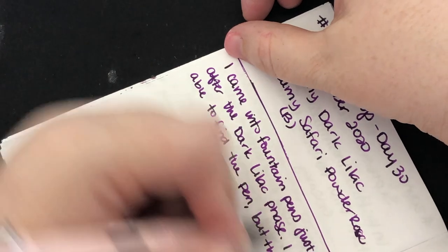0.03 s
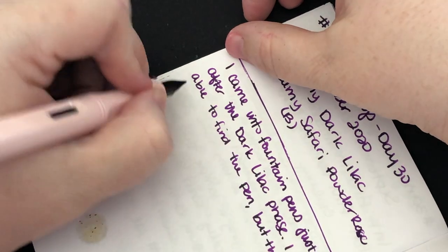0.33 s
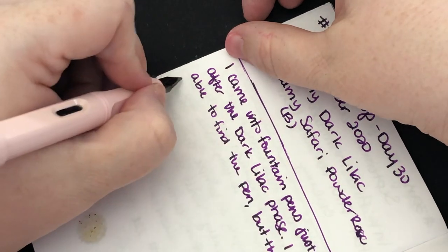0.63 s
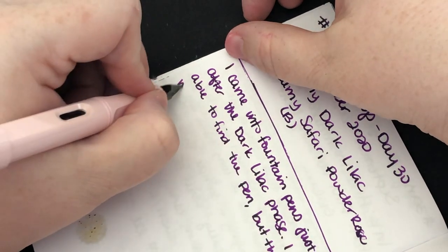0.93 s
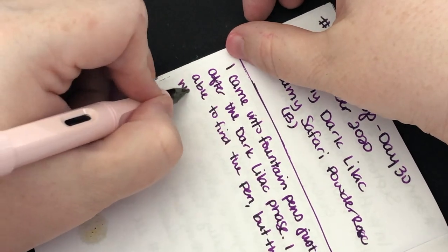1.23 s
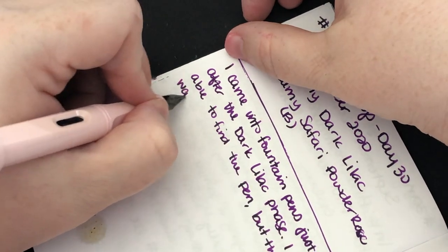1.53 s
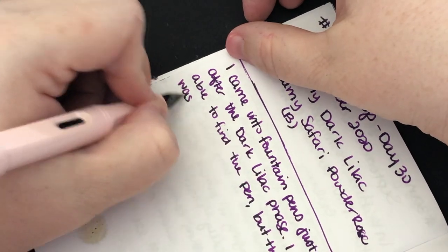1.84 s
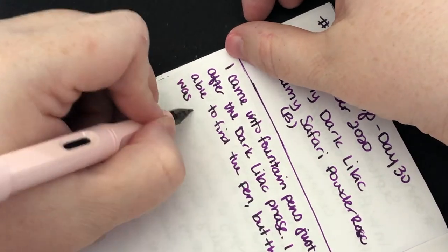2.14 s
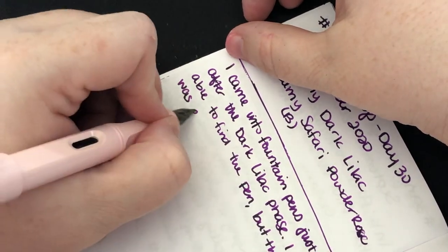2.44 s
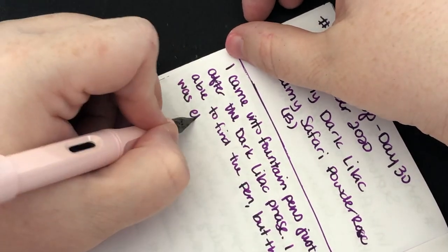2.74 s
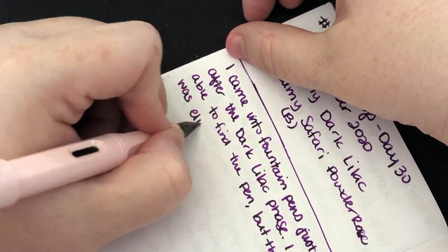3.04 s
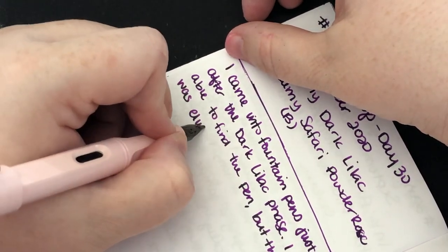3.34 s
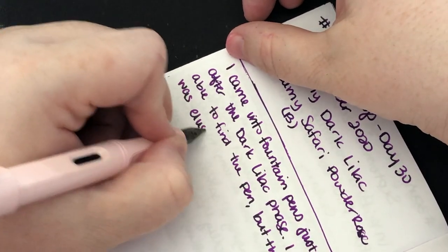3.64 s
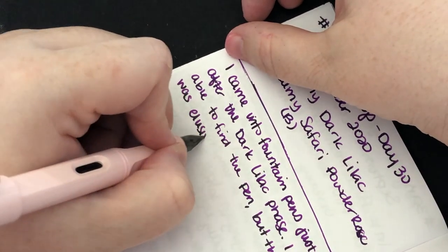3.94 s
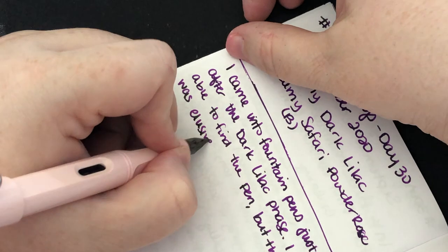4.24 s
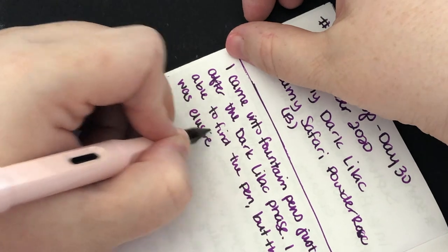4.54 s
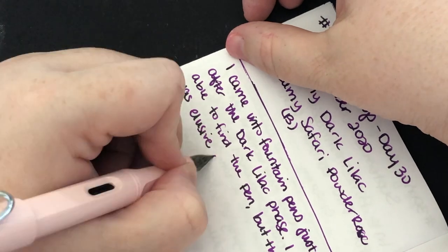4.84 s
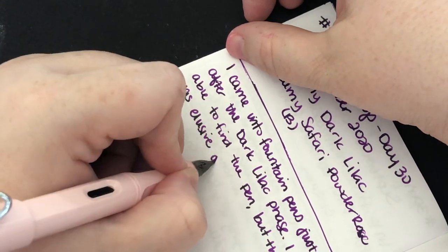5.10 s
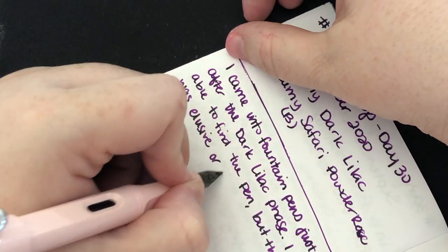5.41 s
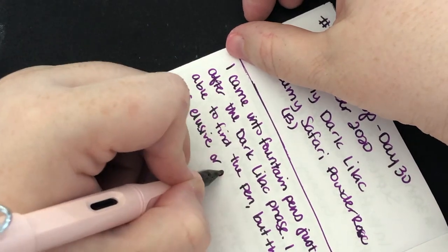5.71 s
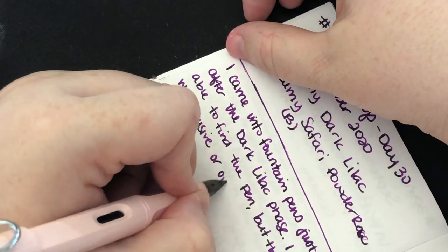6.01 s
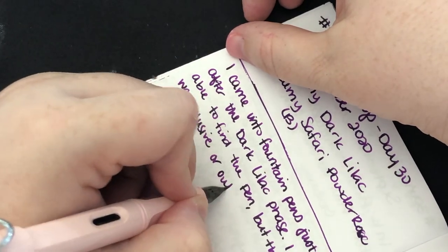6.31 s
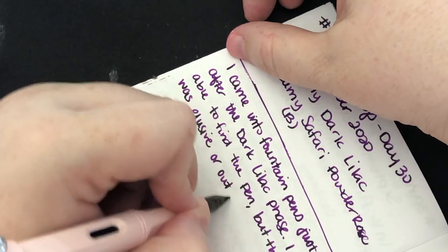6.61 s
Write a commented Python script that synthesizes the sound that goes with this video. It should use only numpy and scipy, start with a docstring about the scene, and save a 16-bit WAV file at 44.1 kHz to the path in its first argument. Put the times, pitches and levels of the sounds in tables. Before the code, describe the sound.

A fountain pen writes on notebook paper, heard close up in a quiet room. A soft fan-like rush, light hiss and faint hum run throughout, over a very deep rumble that swells slightly at times. At the very start a hand brushes briefly across the page. From about 0.7 seconds the steel nib scratches in faint, dry strokes, each around a tenth of a second long, grouped unevenly with short gaps and continuing until about 6.8 seconds. Near 1.9 seconds the nib makes one quick, bright flick with a tick as the hand shifts. The hand slides softly again around 4.5, 5.2 and 6.5 seconds, and gives barely audible low bumps on the desk near 1.2, 3.3, 3.8 and 4.4 seconds. The nib touches down with small dull ticks at about 3.7 seconds and three times between 5.2 and 5.6 seconds, where the writing is slightly firmer.

```python
"""Fountain pen in a notebook

A steel nib writes a few words in a quiet room. Each stroke drags it over paper fibres, whose catches
ring pen, nib and pad faintly. Between words the hand slides over the page or bumps the desk; the nib
flicks once and now and then taps down. Behind: a soft fan-like rush, hiss, deep rumble and hum."""
import sys
import numpy as np
from scipy import signal
from scipy.fft import rfft, irfft
from scipy.io import wavfile

SR = 44100
rng = np.random.default_rng(int(sys.argv[2]) if len(sys.argv) > 2 else 0)


def wav_out(sig):
    """Save sig, one row per channel (or a flat mono array), as 16-bit PCM at SR to the path in sys.argv[1]."""
    wavfile.write(sys.argv[1], SR, np.round(np.clip(np.atleast_2d(sig).T, -1, 1) * 32767).astype(np.int16))


N = 298116
TIME = np.arange(N) / SR


def from_db(db):
    """Decibels to gain."""
    return 10 ** (np.asarray(db) / 20)


def rms_one(x):
    """Scale to unit rms."""
    return x / np.sqrt(np.mean(x ** 2) + 1e-20)


def coloured(x, spectrum):
    """Filter by (Hz, relative dB) points, rolling off below the first; rms 1."""
    hz, db = np.transpose(spectrum)
    bins_hz = np.maximum(np.arange(N // 2 + 1) * SR / N, 1e-3)
    gain = from_db(np.interp(np.log(bins_hz), np.log(hz), db))
    roll_off = np.minimum(bins_hz / hz[0], 1) ** 2
    return rms_one(irfft(rfft(x) * gain * roll_off, N))


def fibres(per_s, spread_db):
    """Paper fibres catch and let go at random: dense clicks of uneven size."""
    sizes = from_db(spread_db * np.minimum(rng.exponential(1, N), 4))
    signs = rng.choice([-1, 1], N)
    return sizes * signs * (rng.random(N) < per_s / SR)


def resonate(catches, modes):
    """Each catch pushes or pulls each resonance by chance; rms 1."""
    out = np.zeros(N)
    for hz, width_hz, db in modes:
        b, a = signal.iirpeak(hz, hz / width_hz, fs=SR)
        pushes = catches * rng.choice([-1, 1], N)
        out += from_db(db) * signal.lfilter(b, a, signal.lfilter(b, a, pushes))  # twice: deep valleys
    return rms_one(out)


def knocks(contacts, modes):
    """Single contacts ring damped modes in parallel; a soft contact has no treble."""
    force, out = np.zeros((2, N))
    for start_s, db, cutoff_hz in contacts:
        softness = signal.butter(3, cutoff_hz, fs=SR, output="sos")
        push = signal.sosfilt(softness, signal.unit_impulse(2048))
        at = round(start_s * SR)
        force[at:at + len(push)] += from_db(db) * push
    for hz, width_hz, db in modes:
        radius, angle = np.exp(-np.pi * width_hz / SR), 2 * np.pi * hz / SR
        feedback = [1, -2 * radius * np.cos(angle), radius ** 2]
        out += from_db(db) * signal.lfilter([0, np.sin(angle)], feedback, force + 1e-18)
    return out


def speed(start_s, length_s):
    """Speed of one movement: a near-symmetric arch, peak 1."""
    phase = np.clip((TIME - start_s) / length_s, 0, 1) ** 0.95
    return 4 * phase * (1 - phase)


def swell(start_s, hold_s, rise_db_per_s, fall_db_per_s):
    """Gain that reaches 1 at start_s, holds and dies away."""
    early_s = np.maximum(start_s - TIME, 0)
    late_s = np.maximum(TIME - start_s - hold_s, 0)
    return from_db(-np.minimum(rise_db_per_s * early_s + fall_db_per_s * late_s, 200))


def sliding_hand():
    """Skin on paper: a fine-grained rub, with a high sizzle on fast slides."""
    # Each row: start in seconds, length in seconds, level in dB, sizzle in dB relative to the rub.
    slides = [(-.06, 0.11, -60.5, 9.5), (0.029, 0.033, -70, 12), (0.034, 0.072, -66, 5),
              (0.084, .11, -63, -16), (1.86, 0.13, -71.5, 0), (4.482, 0.15, -67, 1),
              (5.207, 0.095, -67, -12), (6.48, 0.1, -69, -2)]
    # Each row of both: frequency in Hz, relative level in dB.
    rub_colour = [(1000, -11), (2000, 6), (2750, -1), (3400, -2.5), (4600, 6), (5300, 5), (5900, 6.5),
                  (6800, -3), (7700, 5), (8800, 3), (10000, -3), (11400, 0.5), (15500, -5)]
    sizzle_colour = [(4000, -27), (7000, -20), (8000, -5.5), (9000, -6), (10000, -14.5), (11800, -1.5),
                     (13000, -6), (14000, -1), (15700, -0.5)]
    rub = coloured(fibres(per_s=23000, spread_db=2.0), rub_colour)
    sizzle = coloured(fibres(per_s=18000, spread_db=1.5), sizzle_colour)
    return sum(from_db(db) * speed(start_s, length_s) * (rub + from_db(sizzle_db) * sizzle)
               for start_s, length_s, db, sizzle_db in slides)


def rush_and_hiss(rush_db=-59.5, hiss_db=-70):
    """Steady fan-like rush and microphone hiss."""
    # Each row of both: frequency in Hz, relative level in dB.
    rush_colour = [(25, 8), (45, 9.5), (80, 1), (200, 1), (270, 2.5), (450, -3.5), (620, -1), (780, -4),
                   (1150, -0.5), (1600, -10), (2100, -14), (2700, -23), (4000, -30)]
    hiss_colour = [(1000, -15.5), (2700, 2), (3100, 3), (3700, 3), (5500, 3), (7200, 1.5), (8500, 4.5),
                   (9400, 0.9), (15500, 0.5)]
    rush = from_db(rush_db) * coloured(rng.standard_normal(N), rush_colour)
    hiss = from_db(hiss_db) * coloured(rng.standard_normal(N), hiss_colour)
    return rush + hiss


def deep_rumble(rest_db=-49.5):
    """Rumble that rises quickly as the hand shifts its weight, then settles slowly."""
    # Each row: peak time in seconds, level in dB.
    hand_shifts = [(.24, -37.5), (1.0, -43), (1.98, -41.5), (2.68, -49), (3.15, -49.5), (4.54, -38.5),
                   (5.27, -42), (6.22, -41), (6.57, -43)]
    # Each row: frequency in Hz, relative level in dB.
    rumble_colour = [(3, -16), (7, -3.5), (12, 1), (16, 6.5), (20, 10), (26, -35.5), (45, -43.5),
                     (90, -69.5)]
    swells = [from_db(db) * swell(peak_s, hold_s=0, rise_db_per_s=111, fall_db_per_s=23)
              for peak_s, db in hand_shifts]
    level = np.sqrt(from_db(rest_db) ** 2 + np.sum(np.square(swells), axis=0))
    return level * coloured(rng.standard_normal(N), rumble_colour)


def mains_and_motor(wander_cycles=0.042):
    """Hum of the mains and a motor; each tone wavers slightly in phase."""
    # Each row: frequency in Hz, rms level in dB.
    hum_tones = [(59.9, -73), (100, -78), (120, -70.5), (128, -76), (179.8, -71.5), (300, -74.5),
                 (360, -79.5), (369, -78.5), (420, -80), (489, -80), (572, -86.5), (855, -82),
                 (1166, -86.5)]
    knots_s = np.linspace(0, TIME[-1], 40)
    out = np.zeros(N)
    for hz, db in hum_tones:
        cycles = hz * TIME + rng.random()
        cycles += wander_cycles * np.interp(TIME, knots_s, rng.standard_normal(len(knots_s)))
        out += np.sqrt(2) * from_db(db) * np.sin(2 * np.pi * cycles)
    return out


def pen_strokes(usual_db=-77, pen_gain_db=3.0, nib_gain_db=1.4, pad_gain_db=11.5):
    """The same fibre catches shake pen, nib and pad; all follow stroke speed, the pad also weight."""
    # Each row: start in seconds, length in seconds, drive in dB, weight on the pad in dB.
    strokes = [(0.677, 0.067, -75.5, 1), (0.772, 0.06, -75, -4), (.85, .08, -76, -10),
               (0.969, 0.06, -73, 0), (1.174, 0.13, -79.5, 0.5), (1.303, 0.065, -77, -11),
               (1.4, 0.08, -79, 2.5), (1.627, .095, -78, -7), (1.735, .057, -76.5, -7),
               (2.288, 0.09, -75, 0), (2.378, .13, -74, -1.5), (2.49, 0.093, -77.5, -4),
               (2.61, .1, -75.5, 3), (2.853, .087, -77, 3.5), (2.967, 0.085, -79, -4),
               (3.06, 0.096, -78.5, 3), (3.314, .12, -76.5, 1), (3.454, .049, -80, -2),
               (3.656, 0.068, -73, 2.5), (3.844, .097, -76.5, -3), (3.955, .055, -79, 0),
               (4.159, .13, -76, -3.5), (4.26, 0.074, -81, -5), (4.76, .096, -74, 3),
               (4.867, 0.073, -72, -1), (4.956, 0.086, -74, -8), (5.082, .06, -70.5, 3.5),
               (5.439, 0.1, -75, 2), (5.551, .056, -71, -0.5), (5.753, 0.077, -79, 0),
               (5.876, .048, -74.5, -1), (5.946, .12, -81, 0), (6.047, .098, -82, -13),
               (6.167, 0.1, -76, 0.5), (6.37, .062, -82, -11), (6.707, .087, -77, 0)]
    # Pen rasp, steel nib scratch, paper pad. Each row: frequency in Hz, width in Hz, relative gain in dB.
    pen_modes = [(1980, 710, 3), (3060, 340, 5), (3485, 180, 2), (4250, 420, 2)]
    nib_modes = [(5050, 800, -5), (5850, 860, -1.5), (7650, 820, -1), (8300, 560, -6), (11700, 3200, -15)]
    pad_modes = [(933, 216, 5), (1140, 510, -9), (1480, 680, -10)]
    nib_db_per_db, pad_db_per_db = 0.85, 0.71
    catches = fibres(per_s=5000, spread_db=3.5)
    on_pen, on_nib, on_pad = np.zeros((3, N))
    for start_s, length_s, db, weight_db in strokes:
        stroke = from_db(usual_db) * speed(start_s, length_s)
        effort_db = db - usual_db
        on_pen += stroke * from_db(effort_db)
        on_nib += stroke * from_db(nib_db_per_db * effort_db)
        on_pad += stroke * from_db(pad_db_per_db * effort_db + weight_db)
    pen = from_db(pen_gain_db) * on_pen * resonate(catches, pen_modes)
    nib = from_db(nib_gain_db) * on_nib * resonate(catches, nib_modes)
    pad = from_db(pad_gain_db) * on_pad * resonate(catches, pad_modes)
    return pen + nib + pad


def desk_bumps():
    """The hand bumps the desk softly and rings one low mode."""
    # Each row: start in seconds, drive in dB, contact cutoff in Hz.
    bumps = [(1.222, -49, 200), (3.255, -52, 200), (3.822, -50, 150), (4.402, -49, 150)]
    # Each row: frequency in Hz, width in Hz, gain in dB.
    desk_modes = [(58, 20, -2)]
    return knocks(bumps, desk_modes)


def nib_flick(start_s=1.8732, hold_s=0.0108, scrape_db=-53, snag_s=0.002, snag_boost_db=7):
    """A short bright scrape, so fast that the catches merge; it ends in a snag."""
    # Each row: frequency in Hz, relative level in dB.
    flick_colour = [(800, -8), (1300, -1), (2700, -1), (3400, -6.5), (4600, -8), (5300, 0), (6100, 5),
                    (6900, -10), (7900, 1.5), (9000, 2.5), (9700, -9), (11200, 3.5), (12800, -2),
                    (15000, -7)]
    envelope = swell(start_s, hold_s, rise_db_per_s=1800, fall_db_per_s=2800)
    snag = speed(start_s + hold_s - snag_s, snag_s)
    scrape = coloured(rng.standard_normal(N), flick_colour)
    return from_db(scrape_db + snag_boost_db * snag) * envelope * scrape


def nib_taps(low_cut_hz=270):
    """The nib touches down with a well-damped tick."""
    # Each row: start in seconds, drive in dB, contact cutoff in Hz.
    touches = [(1.8735, -43, 4000), (3.657, -46, 2500), (5.249, -33.5, 910), (5.3195, -45.5, 1500),
               (5.5535, -46, 1500)]
    # Each row: frequency in Hz, width in Hz, gain in dB.
    tap_modes = [(600, 820, -0.5), (866, 410, 1)]
    low_cut = signal.butter(3, low_cut_hz, "high", fs=SR, output="sos")
    return signal.sosfilt(low_cut, knocks(touches, tap_modes))


def scene():
    """Pen, hand and room, close up, in mono."""
    writer = pen_strokes() + sliding_hand() + nib_flick() + nib_taps() + desk_bumps()
    background = rush_and_hiss() + deep_rumble() + mains_and_motor()
    return (writer + background)[None]


def record(dry, cutoff_hz=15700):
    """Steep elliptic low-pass."""
    return signal.sosfilt(signal.ellip(12, .1, 70, cutoff_hz, fs=SR, output="sos"), dry)


dry = scene()
out = record(dry)
wav_out(out)
```